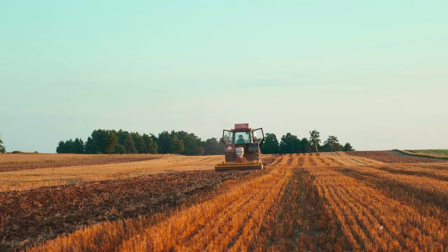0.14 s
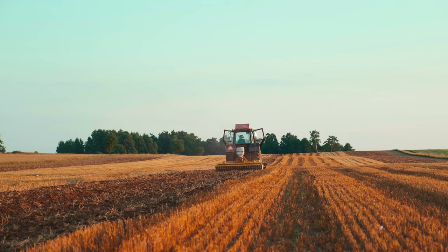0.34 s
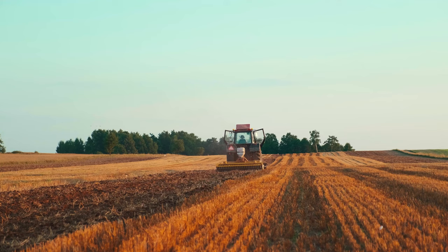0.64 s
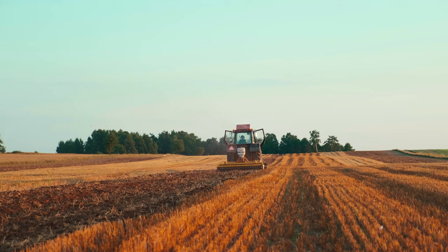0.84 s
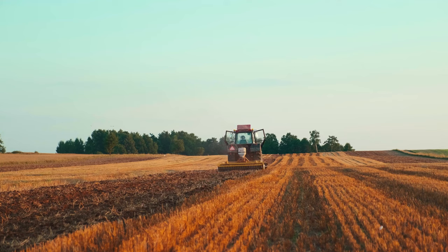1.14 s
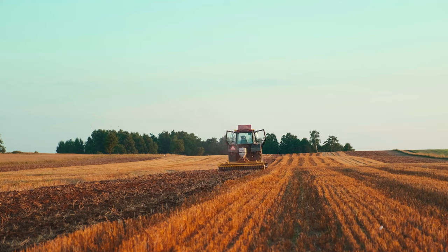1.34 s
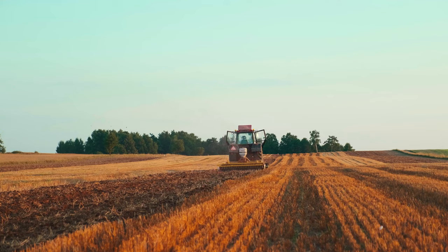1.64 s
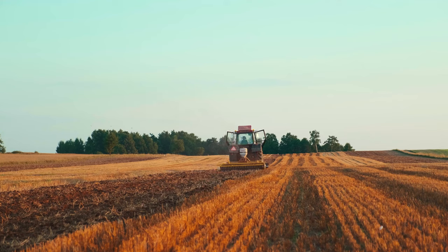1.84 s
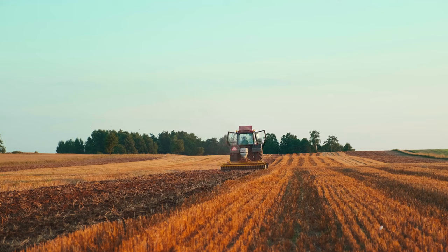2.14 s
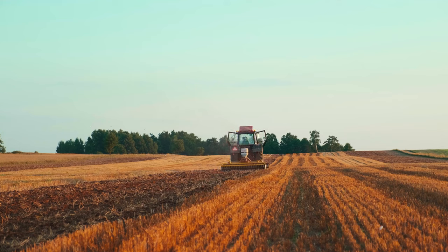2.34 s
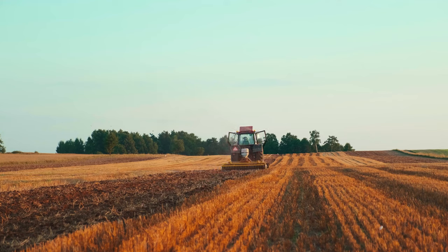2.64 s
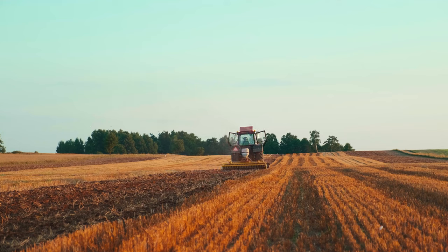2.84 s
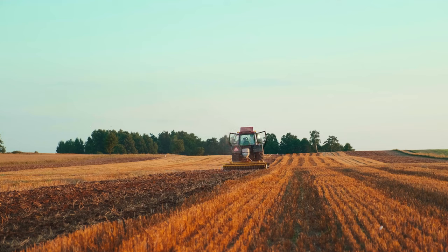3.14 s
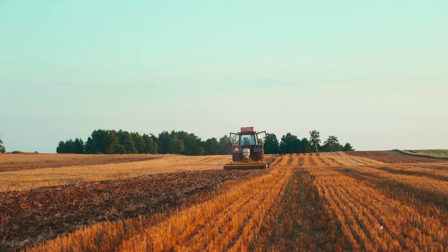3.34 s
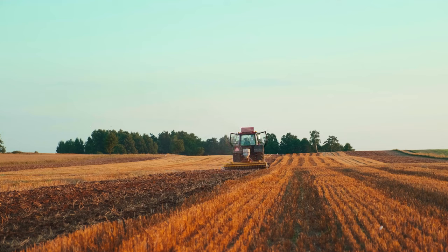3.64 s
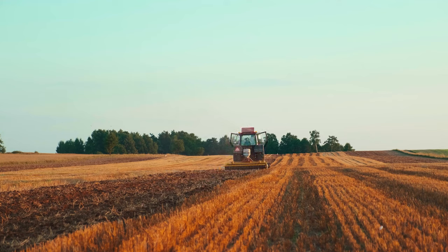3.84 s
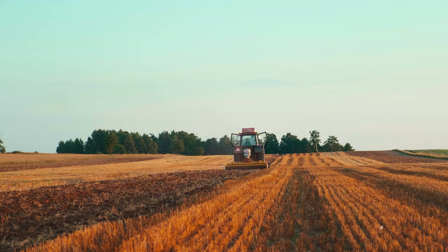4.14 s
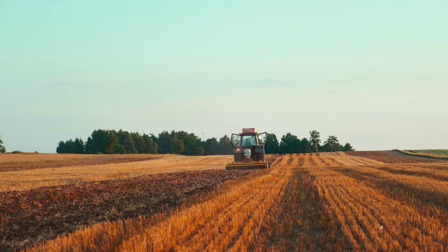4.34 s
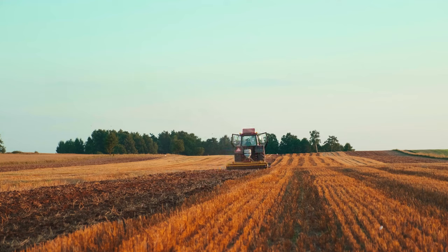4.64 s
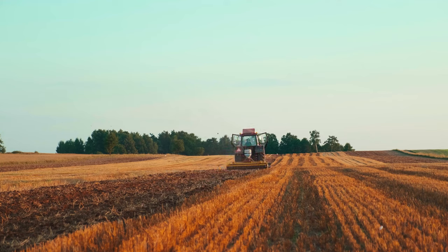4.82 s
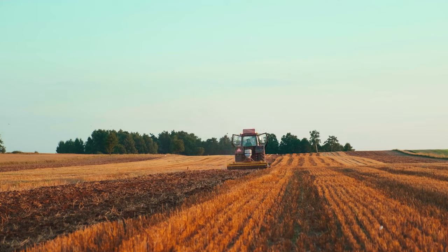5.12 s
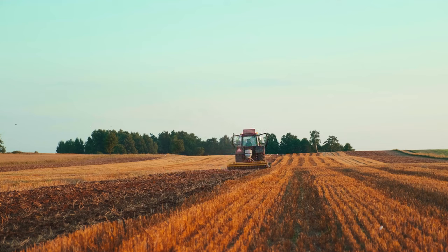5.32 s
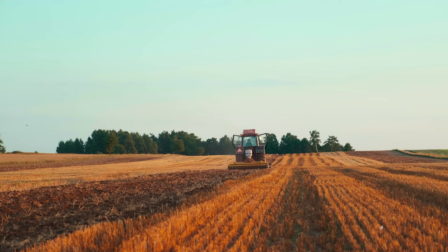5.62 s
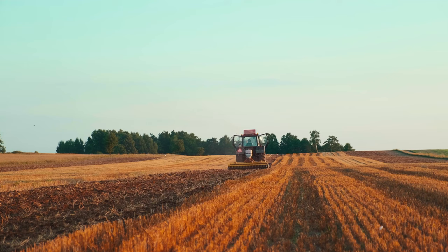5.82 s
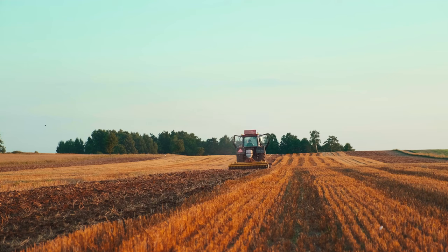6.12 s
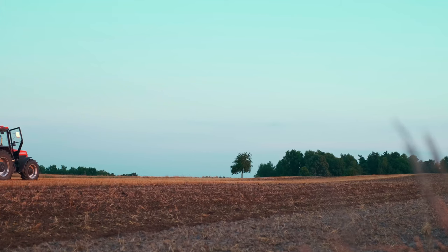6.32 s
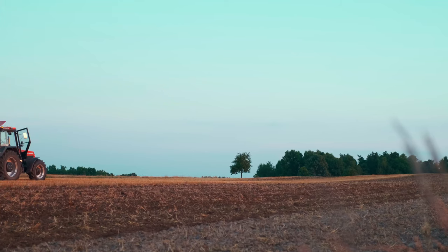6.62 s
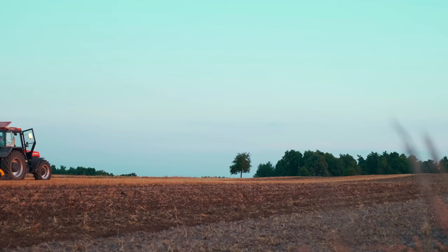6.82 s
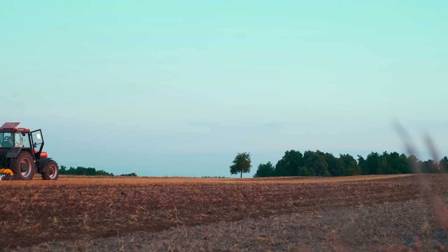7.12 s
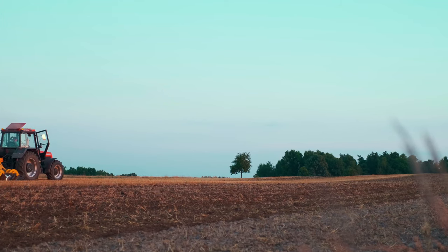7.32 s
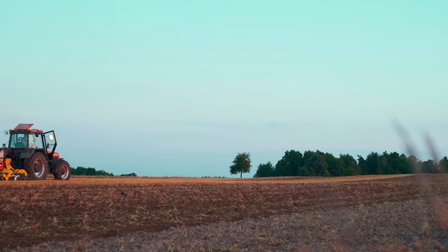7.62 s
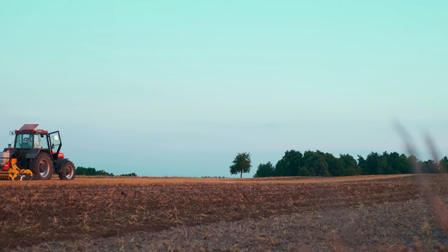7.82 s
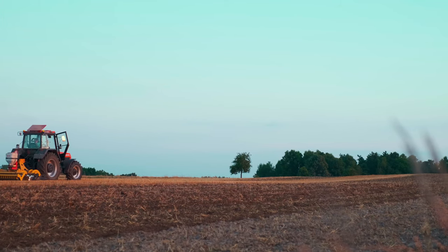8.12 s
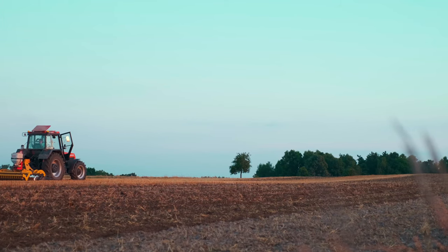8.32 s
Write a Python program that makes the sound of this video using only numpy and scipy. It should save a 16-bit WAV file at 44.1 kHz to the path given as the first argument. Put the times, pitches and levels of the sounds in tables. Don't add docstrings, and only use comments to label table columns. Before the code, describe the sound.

In an open field a diesel tractor works under steady load, a deep fast exhaust drone with knocking, gear noise and tiller growl. A brief dry rustle and a loose panel buzz come early, with a few small stone cracks. Past six seconds the sound cuts instantly to a nearer side position: less deep boom, more clatter, rotor hum and intake whistle, with sharper stone hits. Stereo, dry, no echo.

```python
import sys
import numpy as np
from scipy import signal
from scipy.fft import rfft, irfft, next_fast_len
from scipy.io import wavfile

SR = 44100
rng = np.random.default_rng(int(sys.argv[2]) if len(sys.argv) > 2 else 0)


def undo_db(level):
    steps = np.asarray(level, float) / 20
    return 10 ** steps


def unload_wav(signal):
    wavfile.write(
        sys.argv[1],
        SR,
        np.round(np.clip(np.atleast_2d(signal).T, -1, 1) * 32767).astype(np.int16),
    )


N = 373527
CHANGE_S, BLEND_S = 6.221, .002
CHANGE, BLEND = round(CHANGE_S * SR), round(BLEND_S * SR)
LEFT_RIGHT = np.array([[.5], [-.5]])


def rms_one(x):
    return x / np.sqrt(np.mean(x ** 2) + 1e-20)


def in_time(rows, s):
    columns = np.array(rows).T
    return [np.interp(s, columns[0], column) for column in columns[1:]]


def at_hz(rows, hz):
    log_rows = [(np.log(row[0]), *row[1:]) for row in rows]
    return in_time(log_rows, np.log(hz + 1))


def drift(rate_hz, n):
    pole = np.exp(-2 * np.pi * rate_hz * 40 / SR)
    chance = rng.standard_normal(n // 40 + 2002)
    slow = signal.lfilter([1], [1, -2 * pole, pole * pole], chance)[2000:]
    return np.interp(np.arange(n) / 40, np.arange(len(slow)), rms_one(slow))


def band(x, low_hz, high_hz):
    return signal.sosfilt(signal.butter(2, [low_hz, high_hz], "band", fs=SR, output="sos"), x)


# centre_s, length_s, change_db
BITES = [
    (1.65, .4, 1),
    (2.45, .1, 1),
    (3.45, .12, -1),
    (5.05, 0.11, -0.5),
]


def tractor(start, stop, speed, engine, layers, orders, rotor, noise, first_turn, lag):
    s = np.arange(start, stop) / SR
    boom_db, swell_db = in_time(engine, s)
    firings = first_turn + np.cumsum(in_time(speed, s)[0]) / SR
    levels_db = [db + share * swell_db - fade * (s - s[0]) for db, share, fade in layers]
    for centre_s, length_s, change_db in BITES:
        levels_db[0] = levels_db[0] + change_db * np.exp(-((s - centre_s) / length_s) ** 2)
    rotor_per_firing = .3563
    out = exhaust_boom(firings, boom_db)
    out = out + shaft_tones(firings / 6, orders, wobble_db=2.0, slip=0.056)
    out = out + shaft_tones(firings * rotor_per_firing, rotor, wobble_db=0.0, slip=0.091)
    out = out + ground_rumble(len(s))
    return out + engine_noise(firings, *noise, lag, levels_db, repeat=0.33, patchy_db=0.68)


def exhaust_boom(firings, boom_db):
    return undo_db(boom_db + 0.078 * drift(8.4, len(firings))) * np.sqrt(2) * np.cos(2 * np.pi * firings)


def shaft_tones(turns, table, wobble_db, slip):
    out = np.zeros(len(turns))
    for multiple, level_db in table:
        wander = drift(2.2, len(turns))
        level = undo_db(level_db + wobble_db * wander)
        out += level * np.cos(2 * np.pi * (multiple * turns + slip * wander + rng.random()))
    return np.sqrt(2) * out


# pitch_hz, depth_db, peak_position_firings, uneven_db
THROB = [(300, .3, .3, .3), (750, 2.8, .36, .2), (1500, .6, .5, .3), (2700, .8, .62, .3),
         (4700, 1.9, .5, .5), (8000, 2.3, .58, .5)]


def engine_noise(firings, spectrum, shape, image, lag, levels_db, repeat, patchy_db):
    n = len(firings)
    size = next_fast_len(n)
    hz = np.arange(size // 2 + 1) * SR / size
    cycle = rng.standard_normal(3264)
    knock = cycle[(firings / 6 % 1 * len(cycle)).astype(int)]
    mid = rfft(np.sqrt(repeat) * knock + np.sqrt(1 - repeat) * rng.standard_normal(n), size)
    side = rfft(rng.standard_normal(n), size)

    colour_db = at_hz(spectrum, hz)[0]
    for centre_hz, width_hz, level_db in shape:
        colour_db = colour_db + level_db / (1 + (2 * (hz - centre_hz) / width_hz) ** 2)
    alike, balance_db = at_hz(image, hz)
    pair = mid + np.sqrt((1 - alike) / (1 + alike)) * side * [[1], [-1]]
    pair = pair * undo_db(colour_db + balance_db * LEFT_RIGHT) * np.sqrt(SR / 2) * (hz > 90)
    above_bass = hz ** 2 / (hz ** 2 + 350 ** 2)
    pair[1] *= np.exp(-2j * np.pi * hz * lag / SR * above_bass)

    centres = 100 * 2 ** np.arange(0, 7.5, .7)
    zones = np.zeros((3, 2, n))
    together = drift(16.0, n)
    for k, centre in enumerate(centres):
        overlap = np.interp(np.log(hz + 1), np.log(centres), np.arange(len(centres)) == k)
        depth_db, peak, uneven_db = at_hz(THROB, centre)
        throb_db = depth_db * np.cos(2 * np.pi * (firings - peak))
        throb_db += uneven_db * np.cos(np.pi * (firings - peak))
        gain = undo_db(throb_db + patchy_db * (0.49 * together + drift(5.5, n)))
        zone = np.searchsorted([500, 3400], centre)
        zones[zone] += gain * irfft(pair * overlap, size)[:, :n]
    return sum(undo_db(db) * zone for db, zone in zip(levels_db, zones))


def ground_rumble(n):
    rumble = band(band(rng.standard_normal(n), 32, 114), 42, 170)
    return undo_db(-40.5 + 3.5 * drift(2.3, n)) * rms_one(rumble)


# time_s, firings_per_s
SPEED_AHEAD = [(.3, 81.1), (.62, 80.24), (.9, 81.13), (1.6, 80.58), (2.1, 81.22), (2.75, 80.51),
               (3.05, 81.15), (3.35, 80.71), (4, 81.1), (4.35, 81.41), (5.05, 81.25), (6.22, 81.43)]
# time_s, boom_db, swell_db
EFFORT_AHEAD = [
    (0, -13, 1),
    (.5, -13.5, 0.8),
    (1.3, -13, -0.6),
    (2.7, -13, -0.53),
    (4.1, -13, -0.45),
    (4.7, -13.6, 0.1),
    (5.5, -13.3, -0.2),
    (6.2, -13.3, -1.2),
]
# level_db, share_of_swell, fade_db_per_s
LAYERS_AHEAD = [(-4.5, .8, 0), (0.5, 0.74, -0.0254), (0.2, 1.4, 0.04)]
# multiple_of_engine_cycle, level_db
ORDERS_AHEAD = [(4, -43), (5, -44), (7, -48), (8, -52), (9, -52), (10, -48), (12, -40.5), (14, -53),
                (15, -53), (16, -52), (18, -48), (21, -54), (45, -58), (48, -56), (50, -60), (51, -58),
                (54, -59), (56, -61), (64, -55), (72, -57), (100, -52), (150, -53), (200, -52)]
# multiple_of_rotor_speed, level_db
ROTOR_AHEAD = [(10, -46.5), (12, -62), (30, -61)]
# pitch_hz, level_db_per_hz
NOISE_AHEAD = [(100, -60), (200, -61), (300, -61.5), (400, -73.5), (500, -78.5), (620, -71.5), (1000, -72),
               (1700, -65.5), (2700, -64), (3700, -79), (5000, -86), (7000, -93.5), (10000, -105.4),
               (15500, -122.5)]
# pitch_hz, width_hz, level_db
SHAPE_AHEAD = [(185.5, 6.7, 11.5), (268, 13, 2.5), (760, 290, 3), (1316, 110, 3), (1813, 240, 3.5),
               (1942, 53, -5.5), (2193, 78, 2.5), (3240, 300, 1.5), (5550, 150, 3)]
# pitch_hz, left_right_likeness (0-1), left_minus_right_db
IMAGE_AHEAD = [(400, 1, 0), (860, .94, 0), (1300, .82, -2), (1900, .82, 1), (2300, .86, -1.5),
               (3000, .9, -1), (4300, .72, 2), (8600, .53, .8), (13000, .33, .5)]


def tractor_ahead():
    return tractor(0, CHANGE, SPEED_AHEAD, EFFORT_AHEAD, LAYERS_AHEAD, ORDERS_AHEAD, ROTOR_AHEAD,
                   (NOISE_AHEAD, SHAPE_AHEAD, IMAGE_AHEAD), first_turn=.955, lag=0)


# time_s, firings_per_s
SPEED_ASIDE = [
    (6.22, 81.75),
    (6.55, 82.14),
    (7.1, 81.57),
    (7.4, 81.94),
    (7.7, 81.57),
    (8.47, 82.46),
]
# time_s, boom_db, swell_db
EFFORT_ASIDE = [
    (6.22, -17.5, 0.42),
    (6.5, -16.5, .9),
    (7.3, -16.1, .1),
    (7.9, -17, -0.14),
    (8.47, -16, -.4),
]
# level_db, share_of_swell, fade_db_per_s
LAYERS_ASIDE = [(-.1, .2, .05), (.1, .8, .1), (3.6, 1.1, .2)]
# multiple_of_engine_cycle, level_db
ORDERS_ASIDE = [(4, -45), (5, -45), (7, -50), (8, -43), (9, -46), (10, -44), (12, -46), (14, -55),
                (15, -50), (18, -58), (21, -56), (23, -60), (31, -49), (45, -50), (46, -50), (48, -54),
                (50, -52), (54, -56), (56, -50), (58, -48), (100, -49), (150, -49)]
# multiple_of_rotor_speed, level_db
ROTOR_ASIDE = [(1, -47), (2, -47), (4, -51), (7, -50.5), (8, -32.5), (9, -39.5), (12, -43), (30, -50.5)]
# pitch_hz, level_db_per_hz
NOISE_ASIDE = [(100, -67), (200, -58), (300, -81.5), (450, -75), (600, -67.5), (800, -61.5), (1150, -59),
               (2000, -58.5), (2900, -66), (3700, -77.5), (5000, -85), (7000, -91), (10000, -103.1),
               (15500, -122.3)]
# pitch_hz, width_hz, level_db
SHAPE_ASIDE = [(178, 51, -7.5), (325.5, 60, 18), (417, 105, 12.5), (533, 30, -12.5), (998, 85, -17.5),
               (1120, 160, 5), (1388, 45, 5), (1573, 170, -4.5), (1910, 240, 2.5), (2247, 52, -5),
               (2430, 320, 2), (2840, 150, -4), (3390, 400, 4.5), (4250, 181, 3), (4600, 101, -8),
               (4850, 360, 4.5), (5460, 250, 4.5), (6100, 260, 1.5), (6730, 93, 2.5)]
# pitch_hz, left_right_likeness (0-1), left_minus_right_db
IMAGE_ASIDE = [(500, 1, 0), (1200, .98, .5), (1900, .94, 0), (2400, .89, -2.5), (3200, .84, 2),
               (5000, .82, 3), (8600, .6, 1.8), (12000, .25, 3)]


def tractor_aside():
    return tractor(CHANGE - BLEND, N, SPEED_ASIDE, EFFORT_ASIDE, LAYERS_ASIDE, ORDERS_ASIDE, ROTOR_ASIDE,
                   (NOISE_ASIDE, SHAPE_ASIDE, IMAGE_ASIDE), first_turn=.612, lag=1.95)


# start_s, peak_db, ring_share (0-1), crack_top_hz
STONES = [(1.0007, -25.5, 0.14, 5960), (1.3069, -27, 0.25, 4800), (1.5394, -28, 0.3, 4800),
          (1.9006, -28, 0.3, 4800), (4.2534, -42, 0.3, 7500), (4.515, -30, 0.4, 4260),
          (4.5394, -29, .5, 4300), (4.565, -33.5, .5, 4300), (6.4065, -29.5, 0.6, 6000),
          (6.427, -16, 0.74, 4600), (6.7156, -28, .2, 3800), (6.7415, -28, 0.5, 3800),
          (6.8618, -31, .4, 5970), (6.9586, -23, 0.3, 3900), (7.19, -21, 0.3, 4200),
          (7.7922, -40, .1, 7500)]
# pitch_hz, level_db, time_to_fall_60_db_s
TINE = [(3100, -4, .08), (3450, -3, .09), (3714, 0, .09), (4350, -1, .11), (5631, -16, .07),
        (9044, -25, .08), (10900, -30, .06)]


def stones():
    out = np.zeros((2, N))
    t = np.arange(SR // 8) / SR
    hz, mode_db, t60_s = np.array(TINE).T[:, :, None]
    contact_s, tick_db, tick_t60_s, pan_db = 0.00031, -26.5, 0.056, 6.5
    contact = 1 - np.exp(-t / contact_s)
    for start_s, peak_db, share, top_hz in STONES:
        luck = rng.standard_normal((len(TINE), 1))
        modes = undo_db(mode_db + 2 * luck - 60 * t / t60_s) * np.sin(2 * np.pi * hz * t)
        ring = modes.sum(axis=0)
        crack_t60_s = .012 + 0.056 * share
        crack = rng.standard_normal(len(t)) * undo_db(-60 * t / crack_t60_s)
        crack = band(band(crack, 2600, top_hz), 2000, 1.3 * top_hz)
        tick = band(rng.standard_normal(len(t)), 6000, 13000) * undo_db(tick_db - 60 * t / tick_t60_s)
        blow = undo_db(peak_db) * contact * (.4 * share * ring + 1.3 * crack + share * tick)
        out[:, round(start_s * SR):][:, :len(t)] += blow * undo_db(LEFT_RIGHT * pan_db)
    return out


def whistle(curve, width_hz, flutter_db):
    hz, level_db = in_time(curve, np.arange(N) / SR)
    air = rng.standard_normal((2, N)) + 2.0 * rng.standard_normal(N)
    breath = rms_one(signal.sosfilt(signal.butter(2, width_hz / 2, fs=SR, output="sos"), air))
    carrier = np.sqrt(2) * np.cos(2 * np.pi * np.cumsum(hz) / SR)
    return undo_db(level_db + 2 * flutter_db * np.tanh(drift(30.0, N))) * breath * carrier


# time_s, pitch_hz, level_db
PANEL = [
    (0, 2300, -52),
    (.25, 2290, -40),
    (.62, 2290, -38),
    (.75, 2300, -47),
    (.95, 2320, -41),
    (1.2, 2330, -42),
    (1.5, 2350, -56),
    (8.47, 2350, -70),
]


def panel_chatter():
    return whistle(PANEL, width_hz=180, flutter_db=2.5)


# time_s, pitch_hz, level_db
INTAKE = [
    (0, 5550, -71),
    (1.7, 5620, -64),
    (2.2, 5590, -70),
    (3.9, 5600, -67),
    (4.8, 5500, -63.5),
    (6.2, 5565, -65),
    (6.23, 4920, -62),
    (6.8, 4870, -57),
    (7.3, 4920, -53),
    (8.47, 4860, -54.5),
]


def intake_whistle():
    return whistle(INTAKE, width_hz=190, flutter_db=4.5)


# time_s, pitch_hz, level_db
TURBO = [
    (.2, 7510, -78.5),
    (1.5, 7500, -76),
    (3.2, 7550, -69),
    (4.1, 7200, -72.5),
    (4.7, 7100, -73),
    (5.0, 7210, -60),
    (5.3, 7430, -69),
    (6.2, 7350, -70.5),
    (6.23, 7200, -76),
    (8.47, 7180, -72),
]


def turbo_whistle():
    return whistle(TURBO, width_hz=300, flutter_db=4.0)


# time_s, pitch_hz, level_db
CHAIN = [
    (0, 4400, -76),
    (4.4, 4374, -68.5),
    (4.9, 4450, -56.5),
    (6.2, 4400, -62),
    (6.23, 4300, -63),
    (8.47, 4300, -57),
]


def chain_hiss():
    return whistle(CHAIN, width_hz=300, flutter_db=2)


# time_s, level_db
RUSTLE = [
    (0, -73.5),
    (.05, -62),
    (.13, -55.5),
    (.2, -70),
    (.3, -96.5),
]


def stubble_rustle():
    swish = band(rng.standard_normal((2, N)), 6500, 11500)
    return undo_db(in_time(RUSTLE, np.arange(N) / SR)[0]) * rms_one(swish)


def scene():
    ahead, aside = tractor_ahead(), tractor_aside()
    fade = np.sin(np.linspace(0, np.pi / 2, BLEND)) ** 2
    joint = ahead[:, -BLEND:] * (1 - fade) + aside[:, :BLEND] * fade
    machine = np.hstack([ahead[:, :-BLEND], joint, aside[:, BLEND:]])
    whistles = panel_chatter() + intake_whistle() + turbo_whistle() + chain_hiss()
    return machine + stones() + whistles + stubble_rustle()


def roll_off(x):
    return signal.sosfilt(signal.butter(12, 15720, fs=SR, output="sos"), x)


def record(dry):
    return roll_off(dry)


dry = scene()
out = record(dry)
unload_wav(out)
```